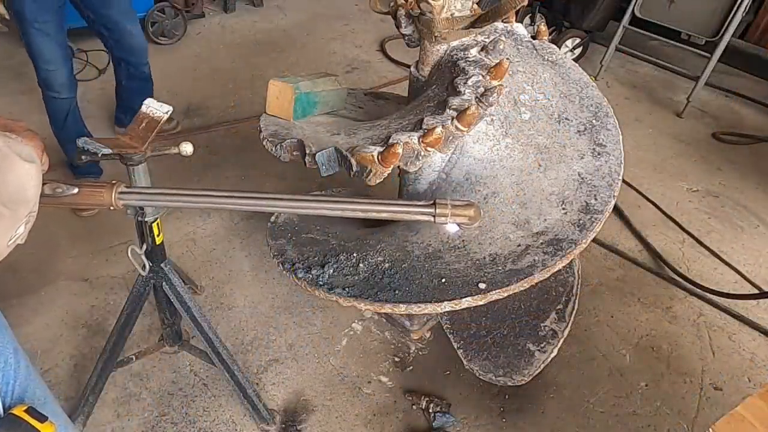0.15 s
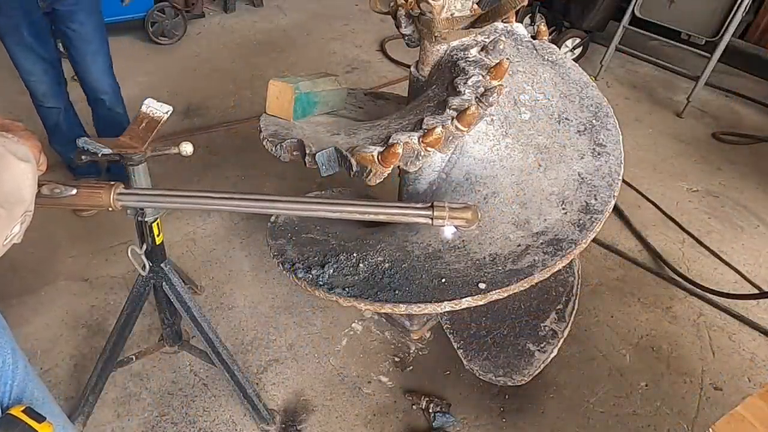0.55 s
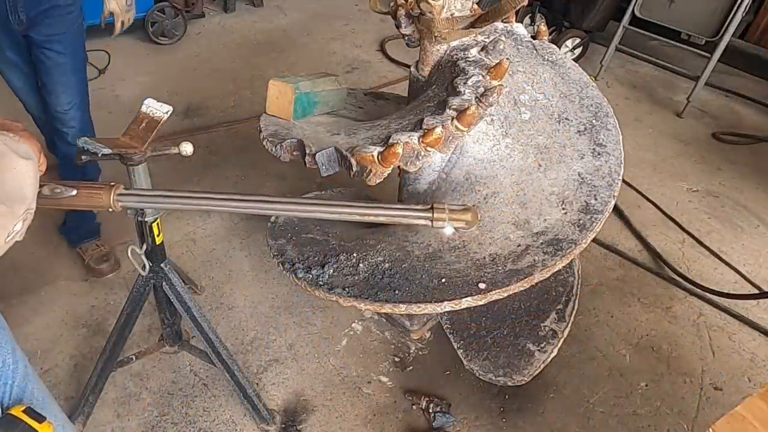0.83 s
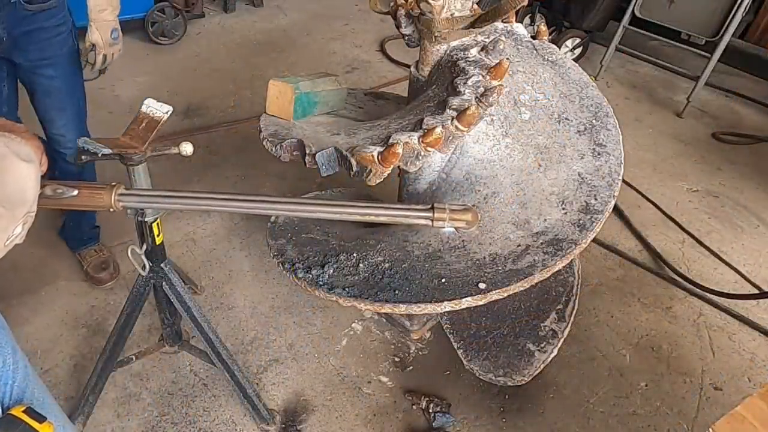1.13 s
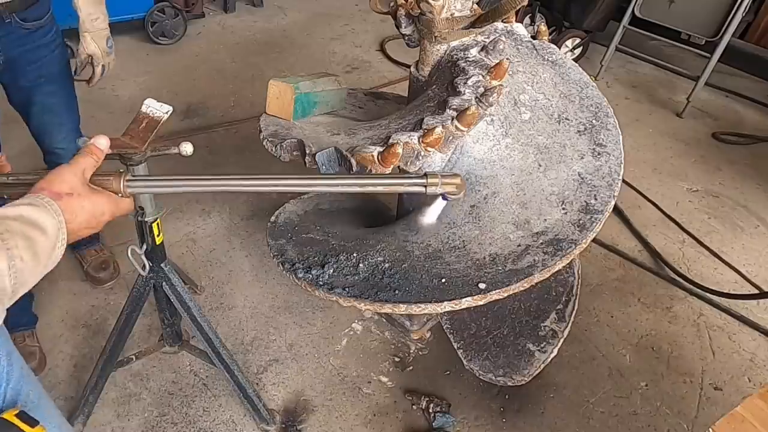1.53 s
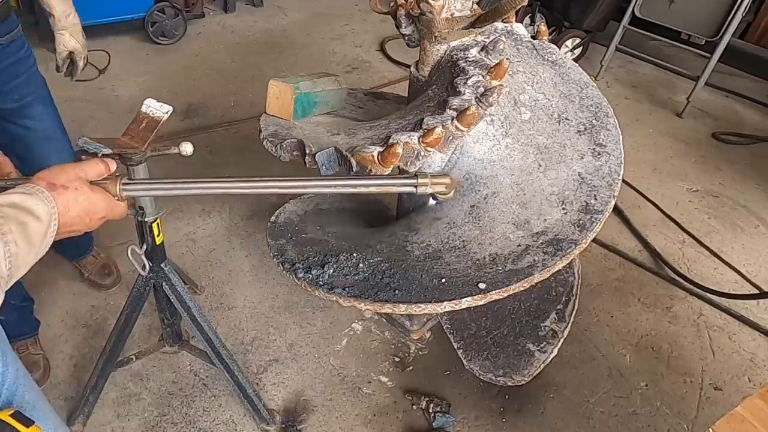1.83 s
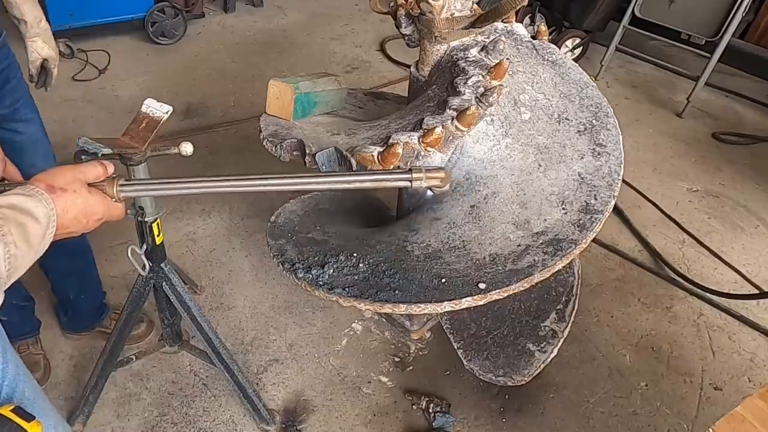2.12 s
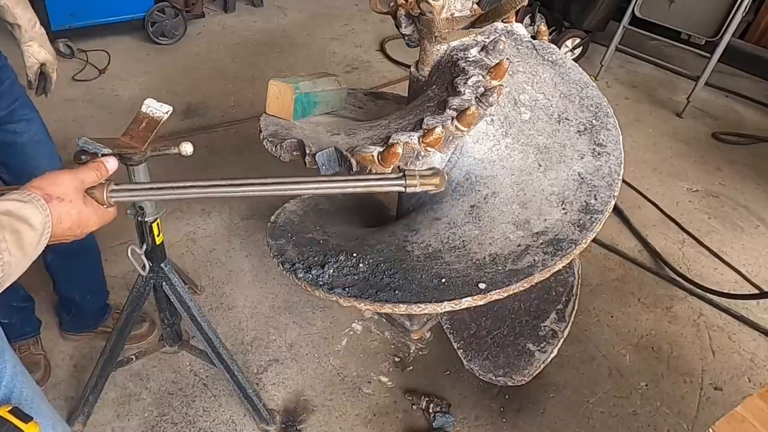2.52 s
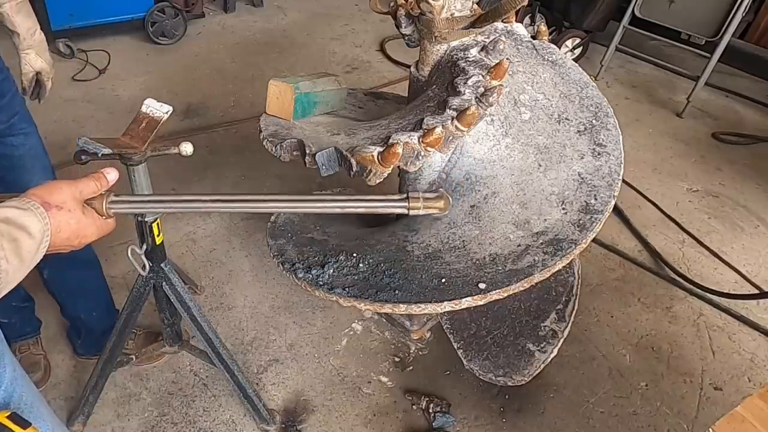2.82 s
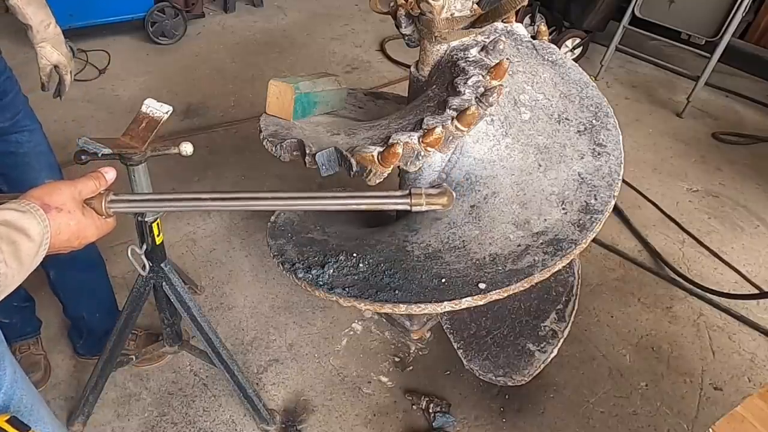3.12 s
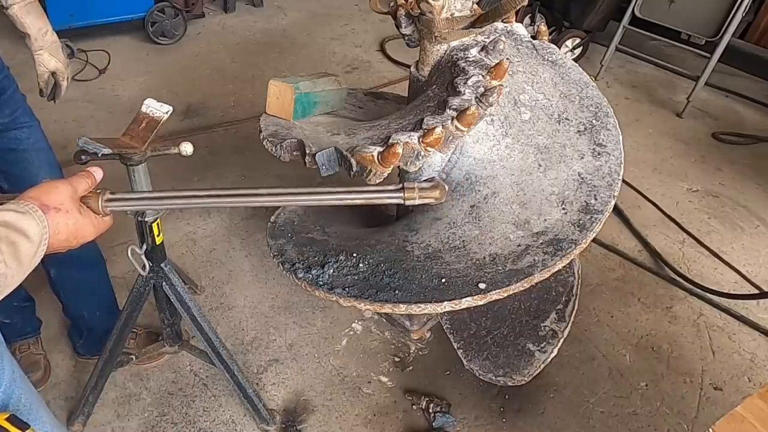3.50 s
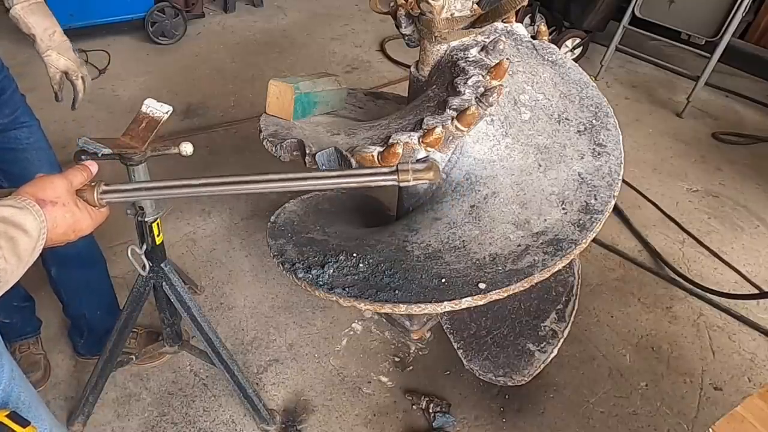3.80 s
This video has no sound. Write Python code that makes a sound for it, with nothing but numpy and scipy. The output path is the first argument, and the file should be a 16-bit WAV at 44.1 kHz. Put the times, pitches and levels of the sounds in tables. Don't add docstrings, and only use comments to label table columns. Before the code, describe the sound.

Gas torch against a hollow steel part, heard close in stereo: quiet roaring flame first, then two strong bright hissing bursts, each starting with a pop, and a third cut off at the end.

```python
import sys
import numpy as np
from scipy import signal
from scipy.fft import rfft, irfft, next_fast_len
from scipy.io import wavfile
from scipy.ndimage import uniform_filter1d

SR = 44100
rng = np.random.default_rng(int(sys.argv[2]) if len(sys.argv) > 2 else 0)


def inscribe(sig):
    pcm = np.round(np.clip(np.atleast_2d(sig).T, -1, 1) * 32767)
    wavfile.write(sys.argv[1], SR, pcm.astype(np.int16))


def invert_db(x):
    u = np.asarray(x, float) / 20
    return 10 ** u


N = 174195
ROAR_MEAN_DB = -32.5


def rms_one(x):
    return x / np.sqrt(np.mean(x ** 2) + 1e-20)


def in_time(rows):
    s, *columns = np.transpose(rows)
    return [np.interp(np.arange(N) / SR, s, c) for c in columns]


def drift(rate_hz, step=1):
    thin = 40
    r = np.exp(-2 * np.pi * rate_hz * thin / SR)
    slow = signal.lfilter([1], [1, -2 * r, r * r], rng.standard_normal(N // thin + 2002))[2000:]
    return np.interp(np.arange(0, N, step) / thin, np.arange(len(slow)), rms_one(slow))


def resonance(x, hz, width_hz):
    r = np.exp(-np.pi * width_hz / SR)
    poles = [1, -2 * r * np.cos(2 * np.pi * hz / SR), r * r]
    return signal.lfilter(np.array([1, 0, -1]) * (1 - r * r) / 2, poles, x)


def lift(x, peaks):
    for hz, width_hz, db in peaks:
        x = x + (invert_db(db) - 1) * resonance(x, hz, width_hz)
    return x


def filtered(x, order, hz, kind):
    return signal.sosfilt(signal.butter(order, hz, kind, fs=SR, output="sos"), x)


def turbulence(spectrum, octaves, shared_db, own_db, rate):
    hz, db = np.transpose(spectrum)
    edges = hz[0] * 2 ** np.arange(0, np.log2(hz[-1] / hz[0]) + 1 / 3, 1 / 3)
    pitch = np.r_[np.log2(hz), np.log2(hz[-1]) + 4]
    pitch_db = np.r_[db, db[-1] - 45]
    white = rng.standard_normal((2, N))
    together = drift(rate, step=20)
    slide = (octaves + np.zeros(N))[::20]
    out, power = 0, 0
    for k, (low, high) in enumerate(zip(edges, edges[1:])):
        band = filtered(white[k % 2], 2, [low, min(high, .45 * SR)], "band")
        centre = np.log2(low * high) / 2
        flicker_db = shared_db * together + own_db * drift(rate, step=20)
        gain = invert_db(np.interp(centre - slide, pitch, pitch_db) + flicker_db)
        out = out + band * np.interp(np.arange(N) / 20, np.arange(len(gain)), gain)
        power += invert_db(2 * np.interp(centre, pitch, pitch_db)) * (high - low) * 2 / SR
    return out / np.sqrt(power)


def lever():
    # time in seconds, level in dB, gas speed in octaves below full.
    squeezes = [
        [(1.725, -53, -1.5), (1.742, -23.5, -1.1), (1.758, -17, -0.26), (1.79, -19, 0.16), (2.32, -20, 0.02),
         (2.39, -23, -0.32), (2.46, -27, -0.67), (2.52, -38.5, -0.44), (2.66, -48, -1.1)],
        [(2.684, -46.5, -1.5), (2.694, -23.5, -1.66), (2.72, -22, -0.6), (2.79, -20, 0.02),
         (3.53, -20.5, -0.11), (3.58, -21.5, -.5), (3.67, -26.5, -0.7), (3.72, -36.5, -0.7), (3.9, -44, -2)],
        [(3.918, -76, -2.5), (3.928, -26.5, -1.46), (3.95, -21, -0.8)],
    ]
    level_db, octaves = in_time(np.concatenate(squeezes))
    level_db[:int(squeezes[0][0][0] * SR)] = -88
    return level_db, octaves


def jet(level_db, octaves):
    # frequency in Hz, density in dB per Hz.
    full_speed = [(71, -61), (120, -38), (332, -16.5), (1040, -6), (3050, -0.5), (6090, -5.5), (15500, -22)]
    # frequency in Hz, width in Hz, lift in dB.
    rings = [(1020, 115, 3.5), (2700, 67, -0.5), (3070, 350, 1.5), (3750, 240, 3), (4350, 84, 1),
             (6030, 200, 4.5), (9160, 330, 2.5), (12800, 620, 4)]
    hiss = turbulence(full_speed, octaves, shared_db=0.5, own_db=-0.12, rate=5.1)
    hiss = filtered(lift(hiss, rings), 3, 194, "high")
    return invert_db(level_db) * 2 ** (-octaves / 2) * hiss


def tears():
    # start in seconds, length in seconds, level in dB, octaves fallen by the end.
    flutters = [
        (1.733, 0.019, -23.5, -0.23),
        (2.34, 0.13, -24.5, -0.78),
        (2.708, 0.02, -27, -0.096),
        (3.542, 0.132, -25, -0.66),
        (3.919, .05, -30.5, -0.085),
    ]
    # frequency in Hz, density in dB per Hz.
    flutter_spectrum = [(120, -21), (250, -3), (500, -8), (900, -1), (1700, -4.5), (2500, -21), (3200, -40)]
    rise_s, t60_s = .008, .2
    t, gain, octaves = np.arange(N) / SR, np.zeros(N), np.zeros(N)
    for s, length, db, fall in flutters:
        dying_db = -60 * np.maximum(t - s - length, 0) / t60_s
        gain += np.clip((t - s) / rise_s, 0, 1) * invert_db(db + dying_db)
        octaves[t >= s] = fall * np.clip((t[t >= s] - s) / length, 0, 1.2) ** 4
    return gain * turbulence(flutter_spectrum, octaves, shared_db=3.5, own_db=-0.5, rate=16)


def pops():
    # start in seconds, peak in dB, pitch in Hz.
    bursts = [
        (0.45, -21.5, 585),
        (.58, -26, 690),
        (1.736, -17, 680),
        (2.693, -12, 600),
        (3.923, -10, 450),
    ]
    t60_s = 0.032
    out, t = np.zeros(N + SR), np.arange(SR // 10) / SR
    for s, db, hz in bursts:
        puff = invert_db(-60 * t / t60_s) * rng.standard_normal(len(t))
        rung = resonance(resonance(puff, hz, 0.96 * hz), hz, 1.2 * hz)
        out[int(s * SR):int(s * SR) + len(t)] += invert_db(db + 11) * rung
    return out[:N]


def whistles():
    # start in seconds, length in seconds, first pitch in Hz, last pitch in Hz, level in dB.
    glides = [
        (1.776, 0.069, 2600, 4100, -30),
        (1.872, 0.085, 3300, 3580, -33),
        (2.95, .4, 2940, 3130, -31),
    ]
    width_hz = 30
    out, t = np.zeros(N), np.arange(N) / SR
    for s, length, a_hz, b_hz, db in glides:
        u = np.clip((t - s) / length, 0, 1)
        glide_hz = a_hz + (b_hz - a_hz) * np.sin(u * np.pi / 2)
        phase = 2 * np.pi * np.cumsum(glide_hz) / SR
        tone = drift(width_hz) * np.sin(phase) + drift(width_hz) * np.cos(phase)
        out += invert_db(db) * np.sin(np.pi * u) * tone
    return out


def flame_level():
    # time in seconds, level in dB.
    flame_course = [(0, -35.5), (.16, -34), (.45, -33.5), (.6, -35.5), (.72, -37.5), (.75, -42), (.95, -38.5),
                    (1.09, -36), (1.13, -32.5), (1.72, -32),
                    (2.6, -36.5), (3.0, -36.5), (3.8, -34.5), (3.95, -34)]
    return in_time(np.array(flame_course))[0]


def ducking(jet_db):
    strength = np.clip((jet_db + 27.5) / 6, 0, 1)
    return 12.5 * uniform_filter1d(strength, size=int(.05 * SR))


def flame_roar(db, duck_db):
    # frequency in Hz, density in dB per Hz.
    roar_spectrum = [(25, -24), (60, -3), (130, -3.5), (200, 1.5), (280, -5), (900, -8), (1100, -12),
                     (4000, -34.5)]
    # frequency in Hz, width in Hz, lift in dB.
    hollows = [(199, 38, 3.5), (295, 16, 4.5), (440.6, 11, 9.5), (643, 10, 4), (835, 10, 1.5),
               (1047, 17, 0), (1310, 42, 2.5)]
    octaves = 0.079 * (db - ROAR_MEAN_DB)
    roar = turbulence(roar_spectrum, octaves, shared_db=0.5, own_db=-1.0, rate=33)
    return invert_db(db - duck_db) * lift(roar, hollows)


def preheat_hiss(db):
    # frequency in Hz, density in dB per Hz.
    hole_spectrum = [(880, -42), (1500, -8.5), (2620, 2.5), (3690, -6.5), (5000, -5.5), (5670, -12.5),
                     (7840, -15.5), (15500, -25)]
    # frequency in Hz, width in Hz, lift in dB.
    pipe_modes = [(2536, 49, 3.5), (2790, 31, 5), (3550, 21, 2), (4600, 31, 9.5), (4830, 33, 9.5),
                  (5034, 37, 10), (7700, 400, 9.5)]
    # time in seconds, gain in dB.
    tip_angle = [(0, 1), (.56, 1.7), (.62, -0.5), (1.02, -0.5), (1.06, 2), (1.7, 0.4), (2.6, -2.5),
                 (3.9, -1)]
    hiss = lift(turbulence(hole_spectrum, 0, shared_db=-0.07, own_db=1.0, rate=17), pipe_modes)
    hiss = filtered(hiss, 4, 1920, "high")
    follow_db = 0.38 * (db - ROAR_MEAN_DB)
    return invert_db(-47.5 + in_time(tip_angle)[0] + follow_db) * hiss


def walls(x):
    t60_s, wet_db = 0.49, -12.5
    t = np.arange(int(.6 * SR)) / SR
    dull = signal.lfilter([.5], [1, -.5], rng.standard_normal(len(t)))
    echoes = dull * invert_db(-60 * t / t60_s) * (t > .004)
    echoes = echoes / np.sqrt(np.sum(echoes ** 2))
    return x + invert_db(wet_db) * signal.fftconvolve(x, echoes)[:N]


def buffeting(level_db):
    buffet = rms_one(filtered(rng.standard_normal(N), 2, [40, 1060], "band"))
    return invert_db(-33.5 + level_db) * buffet


def sparks():
    # start in seconds, level in dB.
    snaps = [
        (1.105, -46),
    ]
    out, t = np.zeros(N), np.arange(N) / SR
    for s, db in snaps:
        decay = (t >= s) * invert_db(-60 * np.maximum(t - s, 0) / .012)
        out += invert_db(db) * decay * np.diff(rng.standard_normal(N + 1))
    return out


def rumble(duck_db):
    # frequency in Hz, density in dB per Hz.
    rumble_spectrum = [(15, -45), (25, -14), (199, -7.5), (266, 0), (338, -9.5), (394, -17), (1500, -51),
                       (1950, -75), (3300, -120)]
    noise = turbulence(rumble_spectrum, 0, shared_db=2.5, own_db=3.0, rate=6.5)
    return invert_db(-41.5 - 0.41 * duck_db) * noise


def scatter(x):
    cells = signal.stft(x, nperseg=256)[2]
    turned = cells * np.exp(2j * np.pi * rng.random(cells.shape))
    return 1.4 * signal.istft(turned, nperseg=256)[1][:N]


def scene():
    level_db, octaves = lever()
    fire_db, duck_db = flame_level(), ducking(level_db)
    torch = jet(level_db, octaves) + tears() + pops() + whistles()
    torch = torch + flame_roar(fire_db, duck_db) + preheat_hiss(fire_db)
    mid = walls(torch) + sparks() + rumble(duck_db)
    faint = invert_db(-19 + 1.9 * drift(23)) * scatter(np.gradient(mid))
    side = buffeting(level_db) + faint
    return np.array([mid + side, mid - side])


def roll_off(x):
    return signal.sosfilt(signal.butter(12, 15690, fs=SR, output="sos"), x)


def record(dry):
    clip_top, split_hz, cutoff_hz = .6, 11150, 15780
    size = next_fast_len(N + SR)
    hz = np.fft.rfftfreq(size, 1 / SR)
    both = rfft(clip_top * np.tanh(dry / clip_top), size) * (hz < cutoff_hz)
    share = np.clip((hz - split_hz) / 400 + .5, 0, 1)
    low = irfft(both * (1 - share), size)[:, :N]
    high = irfft(both * share, size)[:, :N]
    left = invert_db(-4.5) * (scatter(high[0]) + 0.17 * high[0])
    right = invert_db(2) * high[1]
    return roll_off(low + np.array([left, right]))


dry = scene()
out = record(dry)
inscribe(out)
```